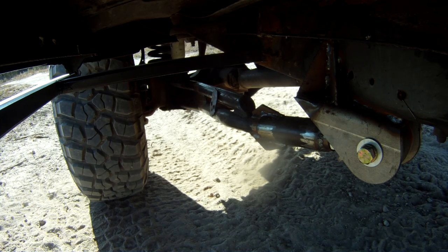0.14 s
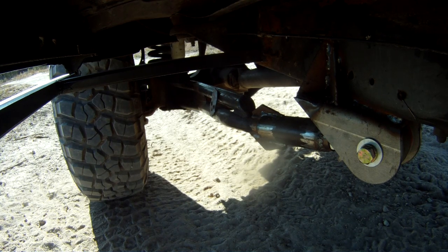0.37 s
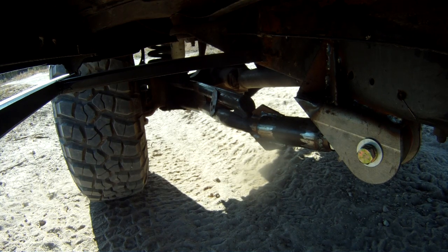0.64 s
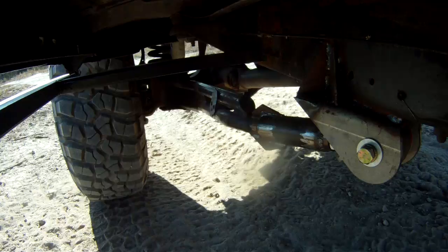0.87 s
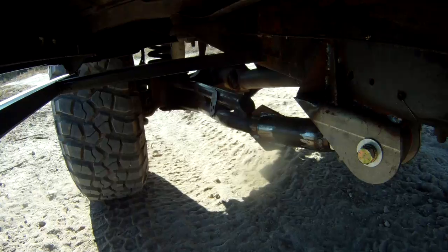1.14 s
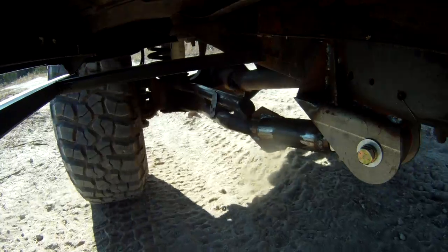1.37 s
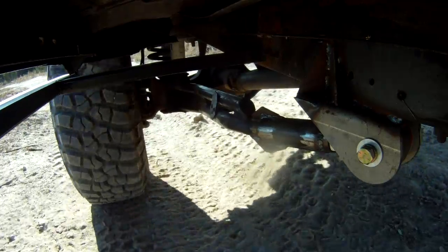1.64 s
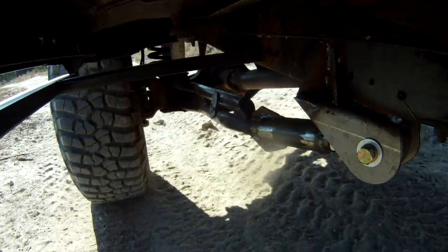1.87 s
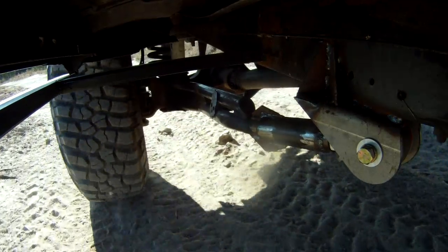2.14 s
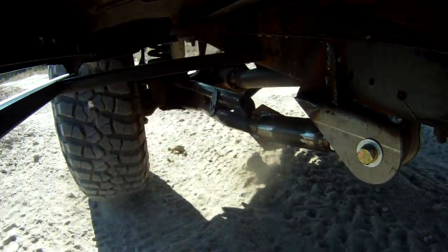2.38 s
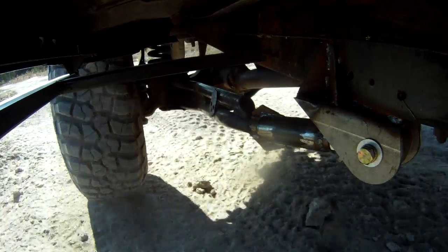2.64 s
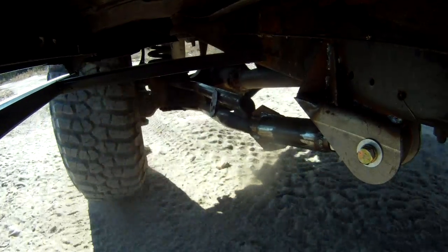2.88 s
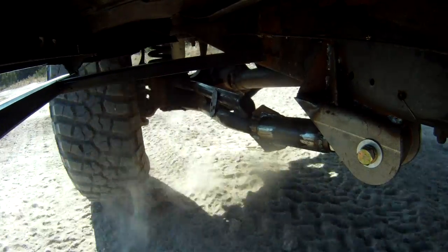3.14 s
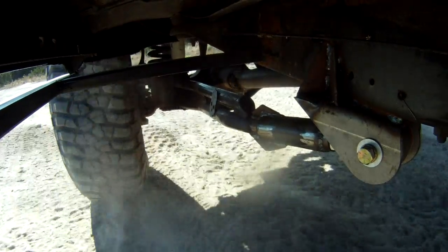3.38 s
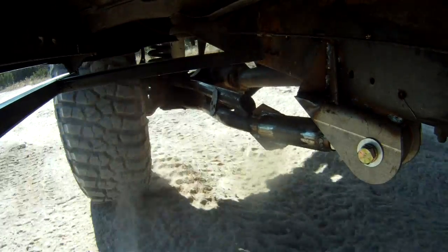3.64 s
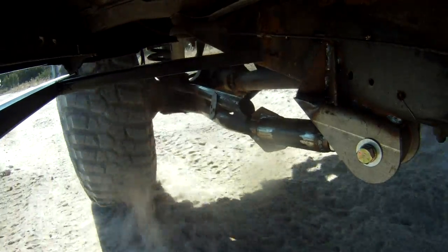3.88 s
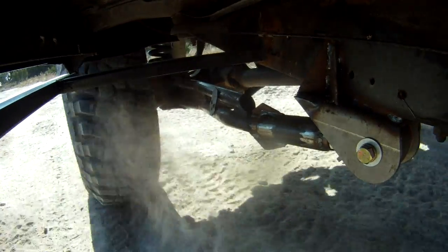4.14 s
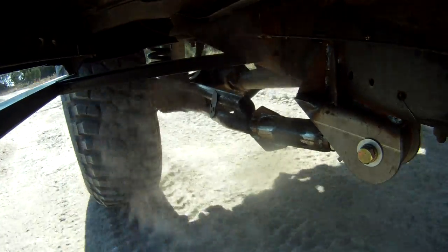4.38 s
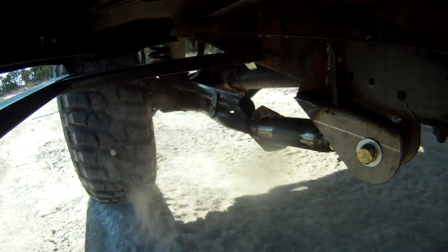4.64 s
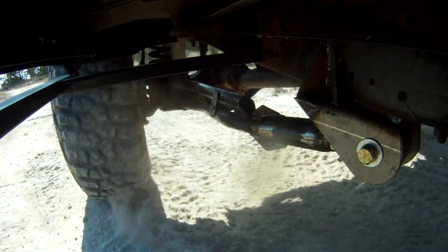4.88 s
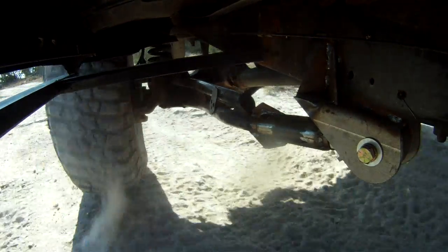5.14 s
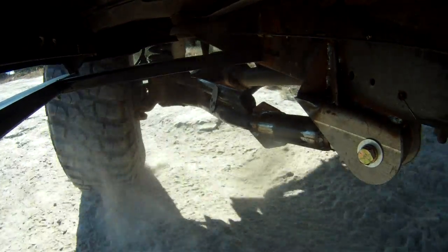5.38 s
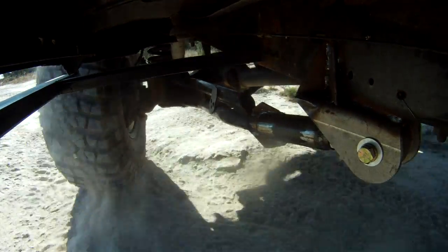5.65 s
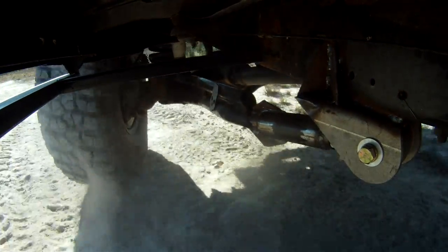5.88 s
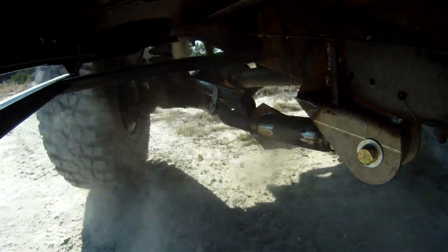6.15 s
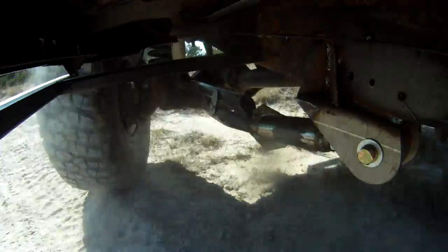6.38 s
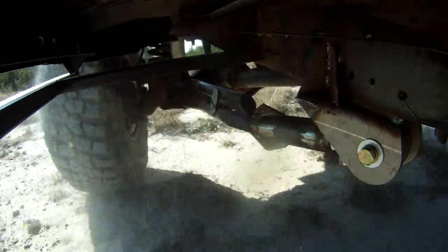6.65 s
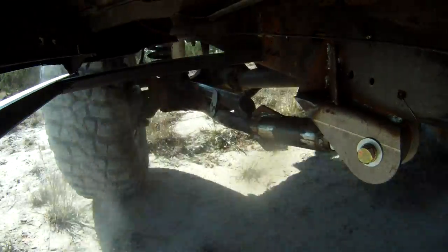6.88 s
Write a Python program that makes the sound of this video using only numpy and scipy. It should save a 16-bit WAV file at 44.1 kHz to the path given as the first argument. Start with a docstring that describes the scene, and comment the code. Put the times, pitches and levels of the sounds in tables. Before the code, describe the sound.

From close beneath a truck, the first second is a low, chugging idle: engine clatter rings through the steel chassis, a faint pump whine holds above it, and one tiny high squeak comes near 0.8 s. From 1.0 to 1.3 s the throttle opens; the exhaust note jumps up more than an octave with a brief rough snarl, and the whine fades. A clear metallic tone sings between about 1.4 and 1.8 s. The note sags around 2.4 s, rises again by 3 s, then drones on unsteadily. As the wheels roll, the frame booms and lurches, with soft thuds near 2.1, 3.7 and 4.2 s and loose dry ticking. Knocks crowd in after 5 s; at 5.6 s a stone cracks sharply against steel and bounces. Rumble and clatter continue to the end at 7 s, through a boxed-in, coarse microphone with gritty treble.

```python
"""Under a truck that pulls away over sand: at idle a pump whines, engine clatter rings the steel chassis, one squeak.
Then the exhaust note, a sine on a moving pitch, climbs; a rough snarl and one clear chassis tone stand out.
As the wheels roll, random shaking booms in the frame; bumps thud, knocks ring and something loose ticks on the
boom's crests. Late on, one thrown stone strikes a steel link and bounces.
A boxed-in camera samples slowly and holds each value, which mirrors the sound into the treble."""
import sys
import numpy as np
from scipy import signal
from scipy.io import wavfile
from scipy.ndimage import uniform_filter1d, minimum_filter1d

SR = 44100
rng = np.random.default_rng(int(sys.argv[2]) if len(sys.argv) > 2 else 0)


def field_ratio(decibels):
    """Amplitude ratio for a level in dB (20 dB per decade); scalars and array-likes work."""
    return 10 ** (np.asarray(decibels, dtype=float) / 20)


def unload_audio(sound):
    """Save the sound as a 16-bit wav file, at the path given as the first command line argument."""
    columns = np.transpose(np.atleast_2d(sound))
    # keep every value between -1 and 1, then stretch to whole-number steps
    steps = np.round(np.clip(columns, -1, 1) * 32767)
    wavfile.write(sys.argv[1], SR, steps.astype(np.int16))


N = 309141  # length in samples

# Chassis modes (ways the steel can ring) in a ringing, a dull and a bright group.
# Each row: pitch in Hz, width in Hz, relative level in dB.
RING = [(944, 55, -11), (1004, 22.3, -3), (1040, 16, 1), (1056.3, 24.7, -3.5), (1113, 53, -6.5)]
DULL = [(270, 37, -6), (409.4, 26, 1.5), (480, 89, -5.5), (617.5, 43, 0.5), (664, 50, 0), (731.5, 44, 2.5),
        (1256, 61, -5), (1410, 25, 2)]
BRIGHT = [(1431, 29, -4), (1550, 49, -5), (1631, 17, 1), (1677, 113, -6.5), (1990, 66, -7), (2096, 27, -1),
          (2262, 93, -6.5), (2332, 9.2, -1), (2440, 76, -7.5), (2704, 94, -16.5), (2775, 24, -10.5),
          (2990, 156, -15.5), (3120, 22, -13.5), (3210, 26, -9), (3260, 230, -16), (4050, 220, -26),
          (3750, 38, -32.5), (5400, 300, -65)]
# Roughness of the ride.
# Each row: time in seconds, level of the frame boom in dB, level of the loose ticking in dB.
RIDE = [(0, -25, -75), (.4, -21, -75), (1.0, -22, -73), (1.22, -18.5, -73), (1.6, -28, -60.5),
        (2.05, -18, -71), (2.5, -18.5, -79), (3, -18, -59), (3.9, -20.5, -60.5), (4.5, -17.5, -55.5),
        (5.5, -19.5, -58), (6.3, -18.5, -52.5), (7.01, -18.5, -57.5)]
THROTTLE_OPENS_S = (1.0, 1.25)  # start and end, seconds


def rms_one(x):
    """Scale to rms 1."""
    return x / np.sqrt(np.mean(x ** 2) + 1e-20)


def in_time(rows):
    """Join the rows of a table by straight lines: one value per sample for each column after the time."""
    s, *columns = np.transpose(rows)
    return [np.interp(np.arange(N) / SR, s, c) for c in columns]


def drift(rate):
    """Slow random wandering of spread 1; a higher rate wanders faster."""
    # made at one fortieth of the sample rate, with the settling start thrown away
    r = np.exp(-80 * np.pi * rate / SR)
    noise = rng.standard_normal(N // 40 + 2002)
    slow = signal.lfilter([1], [1, -2 * r, r * r], noise)[2000:]
    return np.interp(np.arange(N) / 40, np.arange(len(slow)), rms_one(slow))


def resonance(x, hz, width_hz):
    """A two-pole resonance: it favours one pitch, with gain 1 there."""
    r = np.exp(-np.pi * width_hz / SR)
    gain = np.array([1, 0, -1]) * (1 - r * r) / 2
    return signal.lfilter(gain, [1, -2 * r * np.cos(2 * np.pi * hz / SR), r * r], x + 1e-18)


def body(x, modes):
    """Modes ring side by side with alternating signs; then the pitches where neighbours cancel are weakened."""
    # Where neighbouring modes cancel. Each row: pitch in Hz, width in Hz, depth from 0 to 1.
    notches = [(855, 95, .88), (1315, 32, .8), (2765, 150, .88)]
    out = sum((-1) ** k * field_ratio(db) * resonance(x, hz, width) for k, (hz, width, db) in enumerate(modes))
    for hz, width, depth in notches:
        out = out - np.clip(depth, 0, 1) * resonance(out, hz, width)
    return out


def tone(hz, level_db):
    """A sine on a moving pitch; level is rms."""
    return np.sqrt(2) * field_ratio(level_db) * np.sin(2 * np.pi * np.cumsum(hz) / SR)


def swells(rows, rest_db):
    """Level in dB: bell-shaped rises and falls of power added to a resting power."""
    t = np.arange(0, N + 64, 64) / SR
    s, half_width, peak_db = np.transpose(rows)
    bells = np.exp(-.5 * ((t[:, None] - s) / half_width) ** 2)
    power = bells @ field_ratio(2 * peak_db) + field_ratio(2 * rest_db)
    return np.interp(np.arange(N) / SR, t, 10 * np.log10(power))


def dips():
    """Gain in dB of the rumble, which dips for a moment again and again."""
    # Brief dips; a negative depth is a slight lift. Each row: time in seconds, depth in dB.
    dip_rows = [(0.08, 9), (0.232, 13.5), (0.51, 14.5), (0.781, 6.9), (0.941, 8), (1.03, 8.5), (1.7, 17),
                (2.22, 5), (2.771, 3.5), (3.138, 7.5), (3.359, 10), (3.641, 10.5), (3.851, 7.5), (4.06, 9),
                (4.29, 7), (4.431, 10), (4.54, -0.5), (5.0, -1), (5.501, 0.5), (5.831, 7.5), (6.088, -1),
                (6.33, 5), (6.48, 8.5)]
    half_width_s = 0.015
    t = np.arange(0, N + 64, 64) / SR
    s, depth_db = np.transpose(dip_rows)
    gain_db = -np.exp(-.5 * ((t[:, None] - s) / half_width_s) ** 2) @ depth_db
    return np.interp(np.arange(N) / SR, t, gain_db)


def exhaust():
    """The firing note, steady in level at idle and unsteady under load; a rough third order swells as the throttle opens."""
    # The exhaust note. Each row: time in seconds, firing rate in Hz, level in dB.
    firing = [(0.05, 38.5, -30.5), (0.98, 43.7, -37), (1.08, 57.01, -27), (1.15, 68.95, -14),
              (1.31, 97.84, -16.5), (1.6, 97.67, -14), (1.75, 93.3, -15), (2.0, 84.97, -21),
              (2.41, 81.42, -15.5), (2.74, 85.6, -17.5), (2.88, 88.9, -21), (3.0, 98.22, -17.5),
              (3.19, 99.32, -16), (3.48, 95.8, -19), (3.66, 99.84, -13.5), (4.02, 101.1, -15.5),
              (4.53, 99.6, -19.5), (4.8, 105.5, -19.5), (5.5, 105.4, -18.5), (5.89, 103.9, -17.5),
              (6.31, 103.5, -20), (6.45, 96.8, -15.5), (6.7, 100.4, -16), (7.01, 102, -19)]
    # Swells of the third order. Each row: centre in seconds, half width in seconds, level in dB.
    snarl_swell = [(1.2, 0.027, -41), (1.3, 0.045, -44.5)]
    firing_hz, note_db = in_time(firing)
    loaded = np.interp(np.arange(N) / SR, THROTTLE_OPENS_S, [0, 1])
    firing_hz = firing_hz * (1 + .006 * drift(9.8))
    rough_hz = 3 * firing_hz * (1 + .05 * drift(40))
    snarl = tone(rough_hz, swells(snarl_swell, rest_db=-80) + 6 * drift(30))
    return tone(firing_hz, note_db + loaded * (dips() + 1.3 * drift(5.6))) + snarl


def frame():
    """Random shaking rings the low modes, held to a fairly even swing; sway and panel hum are wavering tones."""
    # Low modes of the frame. Each row: pitch in Hz, width in Hz, relative level in dB.
    boom_modes = [(60, 12, -13), (81.5, 12.73, -6), (102, 6.87, -0.5), (132.9, 8, -14.5),
                  (153.7, 22, -24.5), (166.4, 11, -25)]
    # The body lurches. Each row: centre in seconds, half width in seconds, level in dB.
    lurches = [(2.02, 0.027, -29), (2.64, 0.029, -27), (2.77, 0.118, -39), (2.91, 0.033, -26.5),
               (3.02, 0.038, -23), (3.18, 0.02, -26.7), (3.44, 0.026, -24.5), (3.67, 0.07, -43),
               (3.94, 0.035, -30.5), (4.28, 0.0426, -24.5), (4.63, 0.015, -20.5), (4.84, 0.015, -28),
               (5.04, 0.025, -27.5), (5.58, 0.079, -28.5), (5.92, 0.052, -22), (6.23, 0.026, -24),
               (6.63, 0.037, -27.5), (6.76, 0.042, -32.5)]
    # A panel hums up. Each row: centre in seconds, half width in seconds, level in dB.
    hums = [(0.66, 0.053, -50), (1.03, 0.046, -39.5), (1.86, 0.092, -39.5), (2.36, 0.011, -45.5),
            (2.69, 0.056, -43.5), (2.89, 0.046, -45), (3.41, 0.131, -36), (4.3, 0.019, -44.5),
            (4.58, 0.062, -47.5), (4.7, 0.031, -43), (4.84, 0.032, -41.5), (5.14, 0.05, -47),
            (5.54, 0.041, -37.5), (6.17, 0.017, -49), (6.67, 0.08, -45), (6.95, 0.024, -40.5)]
    sway_hz, sway_rest_db = 32.15, -39
    panel_hz, panel_rest_db = 221, -54.5
    # until the wheels start to roll, the sway and the modes below 90 Hz get less
    standing_db = -9 * np.interp(np.arange(N) / SR, (1.6, 2.4), [1, 0])
    low_modes = [m for m in boom_modes if m[0] < 90]
    high_modes = [m for m in boom_modes if m[0] >= 90]
    shaking = rng.standard_normal(N)
    ringing = body(shaking * field_ratio(standing_db), low_modes) + body(shaking, high_modes)
    band = signal.butter(2, [45, 260], "band", fs=SR, output="sos")
    boom = rms_one(signal.sosfilt(band, ringing))
    # divide by the power around each moment to even out the swing
    swing = uniform_filter1d(boom ** 2, size=2600) + 0.024
    boom = rms_one(boom / swing ** 0.54)
    sway_db = swells(lurches, sway_rest_db) + standing_db + 2 * drift(6)
    sway = tone(sway_hz * (1 + .06 * drift(4)), sway_db)
    panel_db = swells(hums, panel_rest_db) + 2.0 * drift(12)
    panel = tone(panel_hz * (1 + 0.0073 * drift(6.1)), panel_db)
    return field_ratio(in_time(RIDE)[0] + dips()) * boom + sway + panel


def clatter_levels():
    """Dull, ringing and bright levels in dB, all following the surges; the bright one is raised at idle."""
    # Surges of clatter.
    # Each row: centre in seconds, half width in seconds, level in dB, ringing modes in dB above that.
    surges = [(0.09, 0.22, -47.5, 2), (0.342, 0.045, -48.5, 5.5), (0.592, 0.14, -48, 4.5),
              (0.908, 0.12, -46.5, 3.5), (1.149, 0.078, -42.5, 4), (1.363, 0.021, -48, 10),
              (1.496, 0.049, -51, 11.9), (1.768, 0.051, -46, 9.5), (1.97, 0.07, -41.5, 9.5),
              (2.261, 0.077, -41, 6), (2.577, 0.12, -44, 8), (2.726, 0.026, -45.2, 4),
              (2.873, 0.055, -37.5, 9), (3.167, 0.077, -43, 5), (3.424, 0.043, -41.5, 7),
              (3.647, 0.068, -42, 6), (3.942, 0.073, -48, 6.6), (4.124, 0.025, -46, 4.5),
              (4.306, 0.039, -47, 7), (4.463, 0.023, -51, 8), (4.65, 0.091, -43.5, 5.5),
              (4.819, 0.031, -41, 3.5), (5.01, 0.07, -44.5, 7.5), (5.135, 0.049, -41.5, 4),
              (5.397, 0.041, -59, 13), (5.582, 0.122, -42.5, 2), (5.646, 0.024, -41.5, 3.1),
              (5.915, 0.054, -42.5, 3.5), (6.169, 0.061, -42, 4.5), (6.364, 0.072, -41.5, 4),
              (6.544, 0.049, -42.5, 8), (6.69, 0.09, -48, 7), (6.952, 0.023, -38.5, -2)]
    rest_db = -53.5
    dull_db, bright_db, idle_bright_db = 1.5, 3.5, 4.5  # added to the clatter level
    s, half_width, peak_db, ringing_db = np.transpose(surges)
    level_db = swells(np.transpose([s, half_width, peak_db]), rest_db)
    ring_db = swells(np.transpose([s, half_width, peak_db + ringing_db]), rest_db)
    # the idle brightness fades as the truck takes up load
    idling = np.interp(np.arange(N) / SR, (1.1, 2.17), [1, 0])
    return level_db + dull_db, ring_db, level_db + bright_db + idle_bright_db * idling


def clatter():
    """Engine clatter and grit: dense uneven taps in clumps, fed to the three groups of chassis modes."""
    taps = rng.standard_normal(N) * field_ratio(0.43 * np.minimum(rng.exponential(1, N), 5))
    taps = taps * (rng.random(N) < 3000 / SR)  # about 3000 taps a second
    taps = taps * field_ratio(1.92 * drift(21.3))
    groups = zip(clatter_levels(), (DULL, RING, BRIGHT))
    return sum(field_ratio(level_db) * rms_one(body(taps, modes)) for level_db, modes in groups)


def knocks():
    """A click, a short scrub of contact and a rattling tail; where a knock lands sets which bright modes ring most."""
    # Knocks on the chassis. Each row: start in seconds, strength of the dull part in dB, its centre in Hz,
    # strength of the bright part in dB, its centre in Hz.
    knock_rows = [(1.857, -26, 1013, -43.5, 1632), (2.5, -24, 1096, -33.5, 1638),
                  (3.976, -24.5, 1060, -33, 1401), (4.004, -44, 1010, -30.5, 2260),
                  (4.229, -40, 1010, -37, 2276), (4.38, -38, 1021, -42, 1665),
                  (4.663, -27, 1000, -40, 1595), (4.999, -21, 1049, -25, 1610),
                  (5.095, -19, 952, -39, 2001), (5.139, -34, 1010, -32.5, 2440),
                  (5.183, -25, 705.2, -40, 1800), (5.341, -30, 1000, -41, 1420),
                  (5.626, -17, 1050, -13.5, 2200), (5.849, -21.5, 1010, -37, 1620),
                  (6.098, -23, 1010, -32.5, 1513), (6.375, -28, 900, -43, 1497),
                  (6.409, -20, 1050, -39, 1484), (6.523, -29, 1007, -34.5, 1990),
                  (6.661, -33.5, 897.5, -59, 1504), (6.919, -25, 902.2, -46, 1738),
                  (6.937, -17.5, 902, -26.5, 1383), (6.946, -25, 975, -24.5, 2440)]
    contact_s = .005
    rattle_s, rattle_db = 0.05, -18.5
    t = np.arange(round(.12 * SR)) / SR
    scrub = rng.standard_normal((len(knock_rows), len(t)))
    shape = np.exp(-t / contact_s) + field_ratio(rattle_db) * np.exp(-t / rattle_s)
    shape = shape / np.sqrt(contact_s)
    dull, bright = np.zeros((2, N + len(t)))
    for (s, dull_db, dull_hz, bright_db, bright_hz), noise in zip(knock_rows, scrub):
        at = round(s * SR)
        blow = (noise + 12 * (t == 0)) * shape
        dull[at:at + len(t)] += field_ratio(dull_db) * resonance(blow, dull_hz, 510)
        landing = resonance(resonance(blow, bright_hz, 1400), 1.3 * bright_hz, 2400)
        bright[at:at + len(t)] += field_ratio(bright_db) * landing
    dull, bright = dull[:N], bright[:N]
    return field_ratio(-10.5) * body(dull, DULL) + body(dull, RING) + body(bright, BRIGHT)


def stone():
    """Every touch of the stone sets each mode of the link ringing with a strength and sign of its own."""
    # A stone strikes a steel link and bounces. Each row: time in seconds, strength in dB.
    touches = [(5.625, -21), (5.628, -14), (5.631, -21), (5.634, -26), (5.639, -31), (5.645, -28),
               (5.652, -31)]
    # Modes of the link. Each row: pitch in Hz, relative level in dB, seconds to fade by 60 dB.
    link = [(1803, -5, 0.053), (1970, 6.5, 0.042), (2099, -1, 0.11), (2310, 2.5, 0.062), (2396, 3, 0.052),
            (2643, -17, 0.046), (2880, -7, 0.064), (3100, -9.5, .06), (3270, -21, 0.06), (3953, -18, 0.06),
            (4170, -14.5, .05), (4350, -28, .04)]
    t = np.arange(round(.3 * SR)) / SR
    out = np.zeros(N)
    luck = rng.standard_normal((len(touches), len(link), 2))
    for (s, touch_db), draws in zip(touches, luck):
        at = round(s * SR)
        for (hz, mode_db, t60), (strength, sign) in zip(link, draws):
            onset = 1 - np.exp(-t / .0004)
            ring = np.sin(2 * np.pi * hz * t) * field_ratio(-60 * t / t60) * onset
            out[at:at + len(t)] += np.sign(sign) * field_ratio(touch_db + mode_db + 2 * strength) * ring
    return out


def thumps():
    """A wheel meets a bump: one soft push, heard as a short dull thud."""
    # Bumps under the wheels. Each row: start in seconds, peak in dB.
    bumps = [(1.387, -40), (1.551, -40), (2.065, -28), (2.244, -45), (3.003, -37), (3.711, -28.5),
             (4.166, -27.5), (4.34, -35), (5.205, -34), (5.561, -43), (5.759, -39), (6.403, -40),
             (6.803, -34), (6.986, -40)]
    click = 1.0 * (np.arange(SR // 20) == 0)
    thud = resonance(resonance(click, 200, 160), 270, 220)
    push = np.zeros(N)
    for s, peak_db in bumps:
        push[round(s * SR)] = field_ratio(peak_db)
    return signal.fftconvolve(push, thud / np.abs(thud).max())[:N]


def singing():
    """One chassis mode sings clear while the truck strains to move: a narrow, slightly wavering tone."""
    # Swells of the tone. Each row: centre in seconds, half width in seconds, level in dB.
    singing_swell = [(1.36, .03, -48), (1.49, 0.029, -39), (1.62, 0.05, -46.5), (1.75, 0.025, -35.5)]
    level_db = swells(singing_swell, rest_db=-82) + 1.1 * drift(15)
    return tone(1037 * (1 + 0.0041 * drift(7.3)), level_db)


def loose_ticks(low):
    """A loose part taps, in a brief scratch, on the crests of the boom; thin hiss follows the bright clatter."""
    tick_db = in_time(RIDE)[1]
    hiss_db = clatter_levels()[2] - 18
    crests = signal.find_peaks(low, height=.06, distance=200)[0]
    luck = rng.random((2, N))
    taps = np.zeros(N)
    taps[crests] = (luck[0, crests] < .85) * field_ratio(-8 * luck[1, crests])  # a few crests are missed
    taps = taps + field_ratio(-2.5) * np.roll(taps * (luck[1] > .5), 110)  # about half of them bounce once
    fading = signal.lfilter([1], [1, -np.exp(-1 / (.0009 * SR))], taps + 1e-18)
    scratch = fading * rng.standard_normal(N)
    scratch = scratch * field_ratio(2.7 * drift(8))  # the taps come in groups
    band = signal.butter(2, [3400, 5600], "band", fs=SR, output="sos")
    hiss = signal.sosfilt(band, rng.standard_normal(N) * field_ratio(1.53 * drift(30)))
    return field_ratio(tick_db) * rms_one(signal.sosfilt(band, scratch)) + field_ratio(hiss_db) * rms_one(hiss)


def idle_tones():
    """Sines for the pump whine, which fades as the throttle opens, and for one short squeak."""
    # Pump whine at idle, before the fade. Each row: pitch in Hz, rms level in dB.
    whine_tones = [(584, -56), (1168, -49), (2918, -59)]
    # The squeak. Each row: time in seconds, pitch in Hz, level in dB.
    squeak = [(.752, 4200, -71), (.765, 4180, -48), (.79, 4190, -46.5), (.802, 4100, -53)]
    t = np.arange(N) / SR
    fade = np.interp(t, THROTTLE_OPENS_S, [1, 0])
    waver = 1 + 0.00208 * drift(2.26)
    whine = sum(tone(hz * waver, db) for hz, db in whine_tones)
    squeaking = (t > squeak[0][0]) & (t < squeak[-1][0])
    return fade * whine + squeaking * tone(*in_time(squeak))


def scene():
    """Add up all sources; the loose part listens to the exhaust and frame."""
    low = exhaust() + frame()
    chassis = clatter() + knocks() + stone() + singing()
    return (low + thumps() + chassis + loose_ticks(low) + idle_tones())[None]


def band_limit(x):
    """A steep low-pass at the top of the band."""
    return signal.sosfilt(signal.butter(12, 16320, fs=SR, output="sos"), x)


def record(dry):
    """A limiter holds the peaks; behind a steep filter the camera samples slowly and holds each value; the top is cut."""
    room = minimum_filter1d(np.minimum(1, .72 / (np.abs(dry) + 1e-9)), size=441, axis=1)
    limited = dry * uniform_filter1d(room, size=441, axis=1)
    dulled = signal.sosfilt(signal.butter(6, 5500, fs=SR, output="sos"), limited)
    slow = signal.resample_poly(dulled, 40, 147, axis=1)  # 44100 to 12000 samples a second
    held = np.repeat(slow, 4, axis=1)  # each value held for four samples at 48000 a second
    out = signal.resample_poly(held, 147, 160, axis=1)[:, :N]  # back to 44100
    out = signal.sosfilt(signal.cheby2(14, 60, 15450, fs=SR, output="sos"), out)
    return band_limit(out)


dry = scene()
out = record(dry)
unload_audio(out)
```